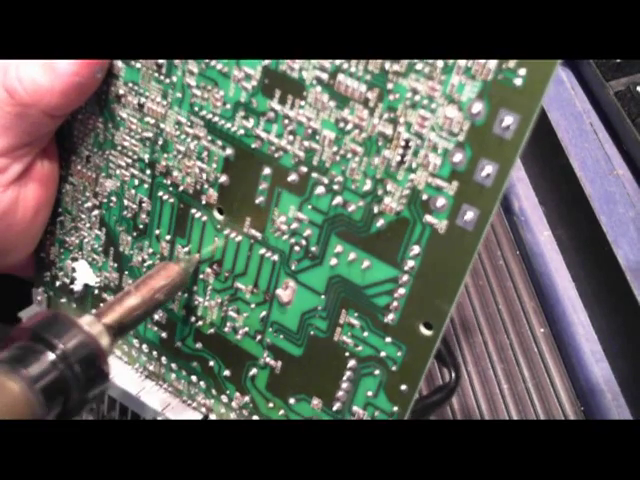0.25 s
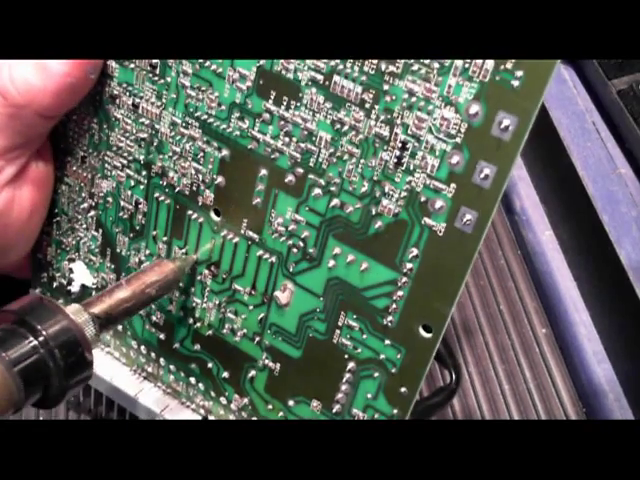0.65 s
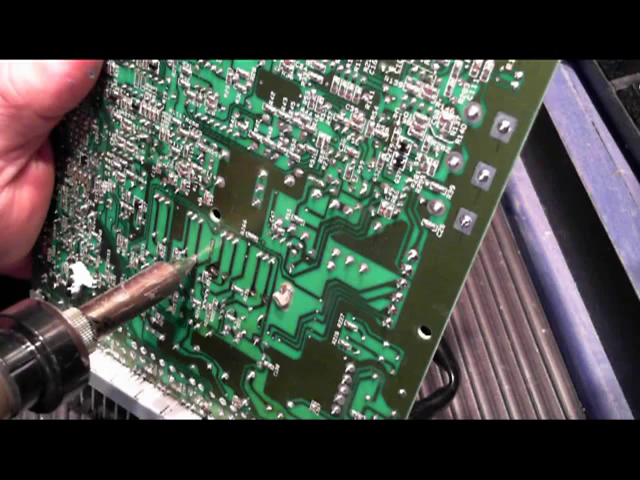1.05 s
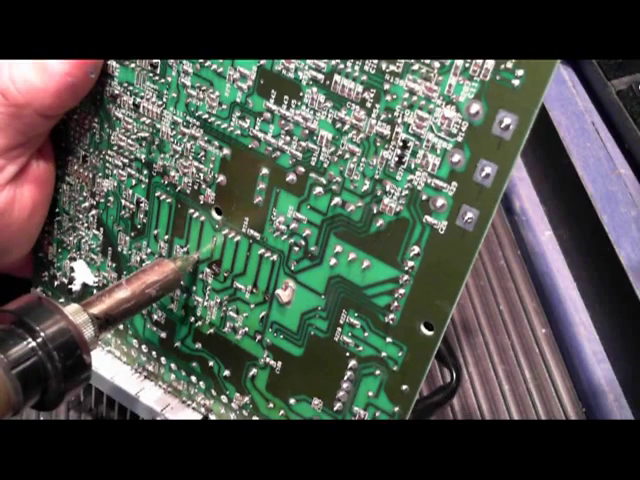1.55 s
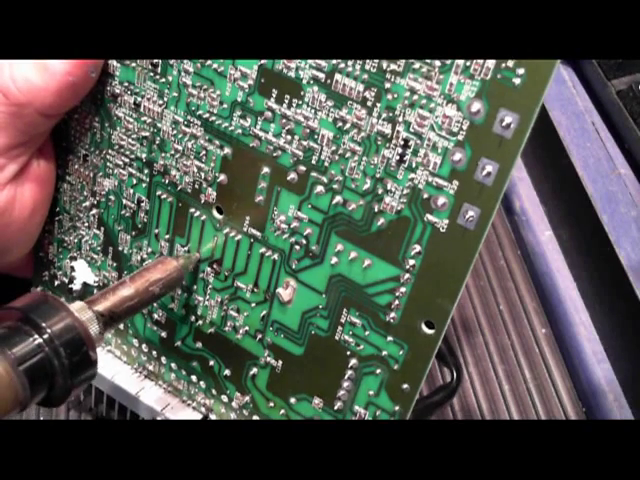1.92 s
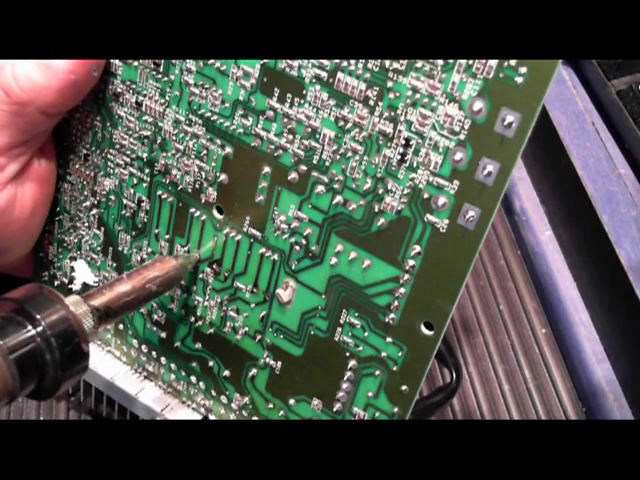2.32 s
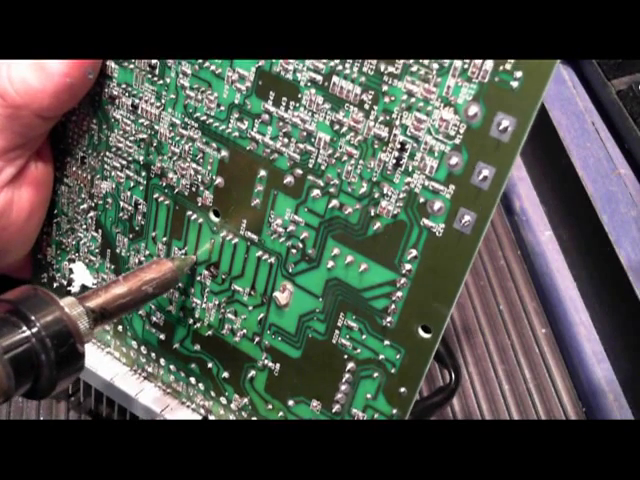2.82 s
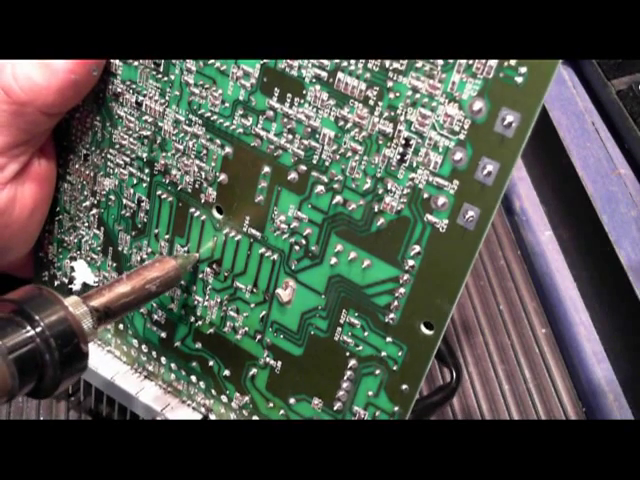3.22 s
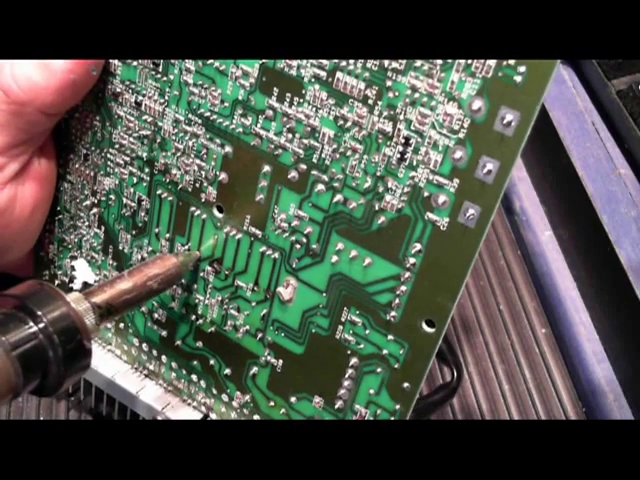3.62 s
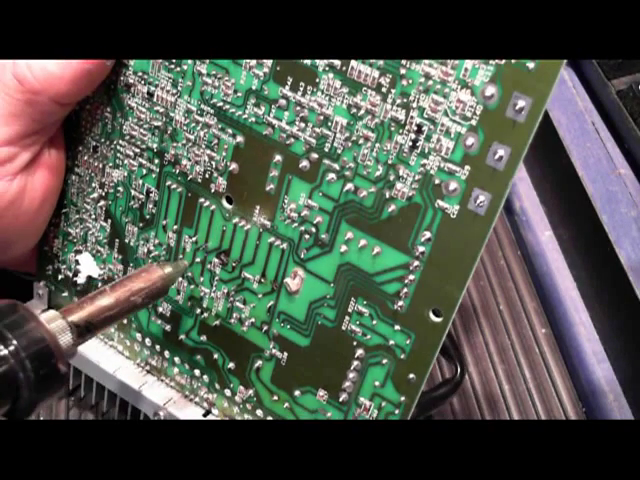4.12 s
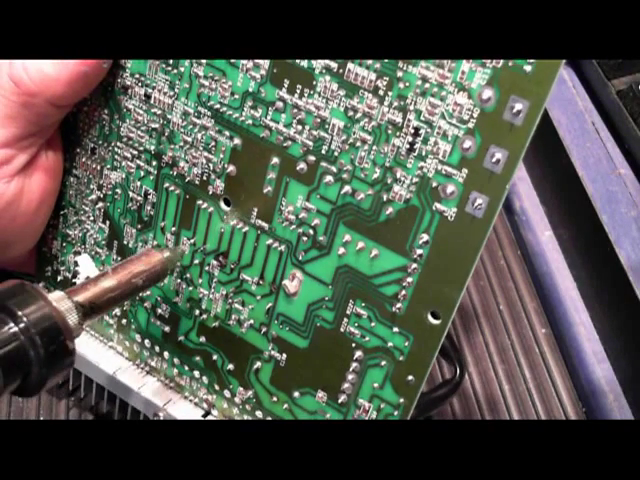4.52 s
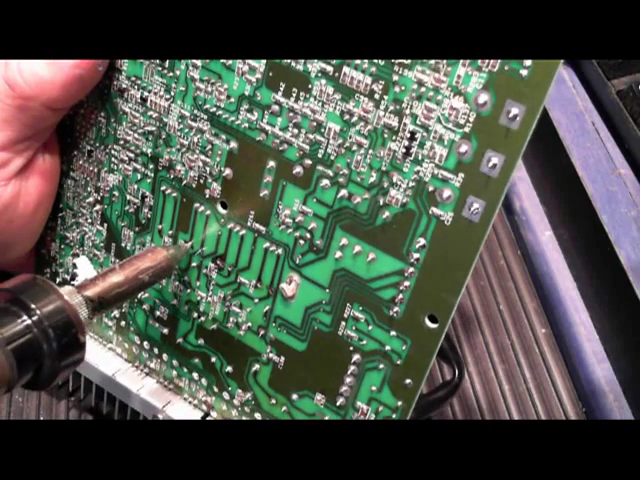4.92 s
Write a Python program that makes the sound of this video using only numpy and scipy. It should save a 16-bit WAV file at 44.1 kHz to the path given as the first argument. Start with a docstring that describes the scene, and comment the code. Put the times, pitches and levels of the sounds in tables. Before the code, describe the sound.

Faint sizzling, then a short buzzing whine and hiss from a desoldering tool's pump, followed by light ticks on a circuit board.

```python
"""A small room, close to a circuit board: a desoldering gun at work. Flux spits twice on the hot nozzle,
the trigger clicks, and the diaphragm pump spins up, sags a little under its vacuum and stops. One shaft
drives its hum, whine, rattle and exhaust hiss in a plastic case. The nozzle then ticks lightly on the
board. Moving air rumbles on the microphone over room hiss and a distant fan."""
import sys
import numpy as np
from scipy import signal
from scipy.fft import rfft, irfft, next_fast_len
from scipy.io import wavfile
from scipy.ndimage import uniform_filter1d, map_coordinates

SR = 44100
rng = np.random.default_rng(int(sys.argv[2]) if len(sys.argv) > 2 else 0)


def pcm_store(signal):
    """Save signal as 16-bit PCM."""
    levels = np.round(np.clip(np.atleast_2d(signal), -1, 1) * 32767)
    wavfile.write(sys.argv[1], SR, levels.astype(np.int16).T)


N = 227203
TIME_S = np.arange(N) / SR
ON_S, SEAL_S, OFF_S = 1.174, 1.45, 2.614  # motor on, solder seals the nozzle, motor off
SINCE_ON_S, SINCE_OFF_S = np.maximum(TIME_S - ON_S, 0), np.maximum(TIME_S - OFF_S, 0)

# Pump case modes. Each row: frequency in Hz, width in Hz, gain in dB.
CASE_MODES = [(472, 59, -14.5), (752, 11.4, -6), (935, 103, -11.5), (1368, 43, -1.5), (1632, 97, 1.5),
              (1924, 64, 5), (2210, 140, -3.5), (2578, 93, 2.5), (2940, 150, -11.5), (3120, 60, -7.5),
              (4510, 230, -12), (4910, 133, -16), (5800, 230, -21)]
# Steel motor can modes. Each row: frequency in Hz, width in Hz, gain in dB.
CAN_MODES = [(1561, 12, -15), (1663, 8, -15), (1906, 9.5, 0), (1935, 14, -6), (1997, 8, -7),
             (2649, 10, -15)]
# Crack of hard plastic. Each row: frequency in Hz, relative density in dB.
PLASTIC_SPECTRUM = [(300, -3), (1300, -13), (2700, 11), (5500, 12), (8000, -4), (9500, -49), (12000, -45)]


def amp(db):
    """Decibels to gain."""
    return 10 ** (np.asarray(db) / 20)


def unit(x):
    """Scale to rms 1."""
    return x / np.sqrt(np.mean(x ** 2) + 1e-20)


def along(points, hz):
    """(Hz, value) points read on a log frequency axis."""
    point_hz, values = np.transpose(points)
    return np.interp(np.log(hz + 1), np.log(point_hz + 1), values)


def wobble(rate_hz):
    """Smooth random curve, rate_hz knots a second."""
    return map_coordinates(rng.standard_normal(int(N * rate_hz / SR) + 4), [TIME_S * rate_hz])


def filtered(x, response):
    """x through a frequency response."""
    size = next_fast_len(N + SR // 2)
    return irfft(rfft(x, size) * response(np.fft.rfftfreq(size, 1 / SR)), size)[:N]


def noise(spectrum):
    """Noise of rms 1, shaped by (Hz, dB) points."""
    return unit(filtered(rng.standard_normal(N), lambda hz: amp(along(spectrum, hz))))


def ring(x, modes):
    """x through (Hz, width Hz, dB) resonances of alternating sign."""
    def response(hz):
        return sum((-1) ** k * amp(db) * 1j * hz * width / (centre ** 2 - hz ** 2 + 1j * hz * width)
                   for k, (centre, width, db) in enumerate(modes))
    return filtered(x, response)


def mode_noise(modes):
    """Noise of rms 1 inside resonances."""
    return unit(ring(rng.standard_normal(N), modes))


def decay(start_s, t60_s):
    """Exponential envelope of a contact."""
    age_s = TIME_S - start_s
    return (age_s >= 0) * amp(-60 * np.abs(age_s) / t60_s)


def ramp(start_s, rise_s):
    """Linear rise from 0 to 1."""
    return np.clip((TIME_S - start_s) / rise_s, 0, 1)


def background(hiss_db=-57, fan_db=-63, whistle_hz=9890, whistle_db=-86):
    """Steady room hiss, a distant fan and a thin electrical whistle."""
    # Each row: frequency in Hz, relative density in dB.
    hiss_spectrum = [(35, -40), (60, 16.5), (91, 1), (331, -5.5), (395, -4), (422, -8.5), (658, -3.5),
                     (719, -6), (1280, 2), (1400, 2.5), (2180, 3.5), (3470, -5), (4730, -7.5),
                     (5770, -16.5), (12000, -26.5), (15600, -60), (22000, -120)]
    # Each row: frequency in Hz, width in Hz, gain in dB.
    fan_modes = [(1308, 45, -3), (1729, 23, 5.5), (2156, 107, 1.5), (2520, 65, -6), (4260, 680, -13)]
    whistle = amp(whistle_db) * np.sin(2 * np.pi * whistle_hz * TIME_S)
    return amp(hiss_db) * noise(hiss_spectrum) + amp(fan_db) * mode_noise(fan_modes) + whistle


def room(x):
    """Bench and walls return a short diffuse tail."""
    # Each row: frequency in Hz, T60 in seconds.
    reverb_times = [(200, 0.2), (2000, 0.19), (10000, 0.36)]
    hz, age_s, bins = signal.stft(rng.standard_normal(SR // 2), SR, nperseg=256)
    tail = signal.istft(bins * amp(-60 * age_s / along(reverb_times, hz)[:, None]), SR, nperseg=256)[1]
    return signal.fftconvolve(x, np.pad(tail, (SR // 300, 0)) / np.linalg.norm(tail))[:N]


def gust(start_s, hold_s, attack_s=.045, release_s=.052):
    """Gust envelope: swells up to start_s, holds, dies away."""
    age_s = TIME_S - start_s
    return ramp(start_s - attack_s, attack_s) ** 2 * np.exp(-np.maximum(age_s - hold_s, 0) / release_s)


def buffeting(draught_db=-57.5):
    """Low turbulence on the microphone; gusts that meet it squarely break into finer eddies."""
    # Each row: frequency in Hz, relative density in dB.
    coarse_spectrum = [(5, 8.5), (14, 0.5), (28, 5.5), (55, -10.5), (100, -35), (160, -53), (300, -59),
                       (700, -93)]
    fine_spectrum = [(30, -2.5), (70, 2.5), (110, -8.5), (160, -18), (260, -33), (600, -68)]
    # Each row: start in seconds, hold in seconds, coarse level in dB, fine level in dB.
    gusts = [(0, 0.14, -33.5, -51), (0.224, 0.15, -41, -62), (0.495, 0.03, -34, -64),
             (0.754, .03, -42, -66), (1.809, 0.72, -36.5, -49), (1.995, 0.09, -50, -34.5),
             (2.177, 0.29, -48, -41), (2.607, 0.06, -36, -45), (2.839, 0.062, -43.5, -69),
             (3.12, 0.23, -50, -72), (4.28, .14, -32.5, -51), (4.513, 0.073, -37, -44),
             (4.655, 0.14, -36, -43), (5.034, 0.12, -36, -54.5)]
    eddies = noise(coarse_spectrum)
    local_power = np.abs(uniform_filter1d(eddies ** 2, size=SR // 10)) + 1e-6
    coarse_power, fine_power = sum(np.outer(amp([coarse_db, fine_db]), gust(start_s, hold_s)) ** 2
                                   for start_s, hold_s, coarse_db, fine_db in gusts)
    coarse = np.sqrt(coarse_power + amp(draught_db) ** 2) * unit(eddies / np.sqrt(local_power))
    fine = np.sqrt(fine_power) * noise(fine_spectrum)
    return (coarse + fine) * signal.windows.tukey(N, .008)


def flux(gain_db=-4, spray_width_hz=300):
    """Flux boils off in short spurts: steam with a pitched spray."""
    # Each row: frequency in Hz, relative density in dB.
    steam_spectrum = [(700, -32), (1400, -11), (2200, 8.5), (3200, 0.5), (5000, -1.5), (6500, 3),
                      (8500, -6), (10000, -9.5), (12000, -13)]
    # Each row: start in seconds, relative level in dB, spray in Hz, rise in seconds, spray/steam in dB.
    spits = [(0.223, -49, 4260, 0.013, 9), (0.253, -37.5, 3240, .012, -4),
             (0.278, -46.5, 2210, 0.0081, 3.5), (0.531, -42.5, 2460, 0.013, -12),
             (0.562, -41.5, 2300, 0.0081, 1)]
    steam, out = noise(steam_spectrum), np.zeros(N)
    for start_s, db, spray_hz, rise_s, spray_db in spits:
        progress = np.maximum(TIME_S - start_s, 0) / rise_s
        spray = amp(spray_db) * mode_noise([(spray_hz, spray_width_hz, 0)])
        out += amp(db + gain_db) * progress * np.exp(1 - progress) * (steam + spray)
    return out


def nozzle(plastic_db=-13):
    """The nozzle ticks against the board, then nudges it softly."""
    # Each row: start in seconds, level in dB, rise in seconds, T60 in seconds.
    taps = [(3.323, -42, .001, .04), (4.191, -47, .003, .05), (4.276, -45, .004, .06),
            (4.612, -50, .008, .12), (4.903, -48.5, .006, .09)]
    # Each row: frequency in Hz, width in Hz, gain in dB.
    board_modes = [(1085, 130, 7), (1500, 250, 9), (2130, 270, 7), (3200, 190, 2)]
    touch = sum(amp(db) * ramp(start_s, rise_s) * decay(start_s, t60_s)
                for start_s, db, rise_s, t60_s in taps)
    return (mode_noise(board_modes) + amp(plastic_db) * noise(PLASTIC_SPECTRUM)) * touch


def grip_clacks(gain_db=-1, t60_s=.029, width_hz=500):
    """The trigger switch and the first hard pump strokes clack in the plastic grip."""
    # Each row: start in seconds, relative level in dB, ring in Hz.
    clacks = [(1.1521, -32.5, 5500), (1.181, -33, 4560), (1.187, -27, 4800), (1.2, -32.5, 4400),
              (2.606, -27.5, 6250)]
    crack = noise(PLASTIC_SPECTRUM)
    return sum(amp(db + gain_db) * decay(start_s, t60_s) * (crack + mode_noise([(hz, width_hz, 0)]))
               for start_s, db, hz in clacks)


def lag(spin_up_s=.15):
    """Share of the spin-up still to come, 1 to 0."""
    return np.exp(-SINCE_ON_S / spin_up_s)


def vacuum(half_s=.21):
    """Vacuum builds from 0 to 1 once the nozzle is sealed."""
    progress = np.maximum(TIME_S - SEAL_S, 0) / half_s
    return progress ** 2 / (1 + progress ** 2)


def drive(rise_s=.026, fall_db_per_s=450):
    """Drive envelope: the motor bites within a stroke or two and brakes against the vacuum."""
    return ramp(ON_S, rise_s) * amp(-fall_db_per_s * SINCE_OFF_S)


def shaft(start_hz=49, free_hz=99, sag_hz=11.75, coast_s=.07, rest_turns=.45):
    """Shaft angle in turns from top of stroke: spins up, sags under vacuum, coasts to a halt."""
    speed_hz = free_hz - (free_hz - start_hz) * lag() - sag_hz * vacuum()
    return rest_turns + np.cumsum(speed_hz * (TIME_S >= ON_S) * np.exp(-SINCE_OFF_S / coast_s)) / SR


def pump_air(turns, exhaust_db=-32, vacuum_db=1.6, puff_db=2, intake_db=-55.5, intake_hz=11000):
    """One exhaust puff a turn, harder under vacuum; a thin intake hiss fades as the hose empties."""
    # Each row: frequency in Hz, relative density in dB.
    exhaust_spectrum = [(150, -26), (400, -26), (1200, -11.5), (1600, -2), (2700, 2.5), (3700, -4.5),
                        (6200, -7.5), (7000, -14), (8300, -15.5), (8900, -25), (9400, -18), (10200, -34),
                        (11500, -29), (13000, -53)]
    exhaust = amp(exhaust_db + vacuum_db * vacuum()) * noise(exhaust_spectrum)
    intake = amp(intake_db) * mode_noise([(intake_hz, 900, 0)]) * (1 - ramp(ON_S, rise_s=.2))
    return drive() * amp(puff_db * np.cos(2 * np.pi * turns)) * (exhaust + intake)


def pump_strokes(turns, rise_s=.0018, fade_db=.65, detune=.002):
    """The motor kicks in its mount; each slow stroke knocks the case and leaves the motor can ringing."""
    # Each row: start in seconds, knock in dB, can in dB, thud in dB.
    starting = [(start_s, -21 - fade_db * k, -38 - fade_db * k, -39 - fade_db * k)
                for k, start_s in enumerate(np.interp(np.arange(15) + 1.8, turns, TIME_S))]
    stalling = [(OFF_S + .008 + .0175 * k + .0015 * k ** 2, -22.5 - 2 * k ** 2, -37 - 2 * k ** 2, -38)
                for k in range(3)]
    # Each row: frequency in Hz, width in Hz, gain in dB.
    thud_modes = [(474, 46, -4.5), (937, 29, 0.5)]
    case, thud = mode_noise(CASE_MODES), mode_noise(thud_modes)
    out = amp(-39) * decay(ON_S, t60_s=.18) * (case + thud)  # mount kick
    for start_s, knock_db, can_db, thud_db in starting + stalling:
        age_s = np.maximum(TIME_S - start_s, 0)
        can = sum(amp(db) * np.exp(-np.pi * width_hz * age_s)
                  * np.sin(2 * np.pi * hz * rng.normal(1, detune) * age_s)
                  for hz, width_hz, db in CAN_MODES)
        knock = amp(knock_db) * decay(start_s, t60_s=.041) * case
        knock += amp(thud_db) * decay(start_s, t60_s=.053) * thud
        out += ramp(start_s, rise_s) * knock + amp(can_db) * can
    return out


def crank_slack(run_db=-39, lag_db=10, release_db=6, release_s=.025):
    """Rattle gain: highest with the crank unloaded, in spin-up and as the drive lets go."""
    return amp(run_db + lag_db * lag() + release_db * ramp(OFF_S - release_s, release_s))


def pump_rattle(turns, per_turn=5, jitter_s=.0005, spread_db=3, accent_db=3, slow_db=5, can_db=2):
    """Valves and crank knock on case and can; one accent a turn, clearest at low speed."""
    knock_turns = np.arange(per_turn, int(turns[-1]) * per_turn) / per_turn
    times_s = np.interp(knock_turns, turns, TIME_S) + jitter_s * rng.standard_normal(len(knock_turns))
    stroke = np.cos(2 * np.pi * knock_turns)
    sizes_db = spread_db * rng.standard_normal(len(knock_turns)) + accent_db * stroke
    sizes_db += slow_db * np.interp(times_s, TIME_S, lag()) * (stroke - 1)
    samples = np.clip(times_s * SR, 0, N - 1).astype(int)
    hits = unit(np.bincount(samples, amp(sizes_db), N)) * drive()
    rattle = ring(hits, CASE_MODES) + amp(can_db) * ring(hits, CAN_MODES)
    case_gain = np.std(ring(rng.standard_normal(N), CASE_MODES))
    return crank_slack() * rattle / case_gain


def shaft_partials(turns, orders, waver_db, flutter_rad):
    """Tones locked to the shaft, each unsteady in level and phase; rms 1."""
    return unit(sum(amp(db + waver_db * wobble(9.19))
                    * np.sin(2 * np.pi * (order * turns + rng.random()) + flutter_rad * wobble(45))
                    for order, db in orders))


def pump_tones(turns, panel_hz=1290, extra_fall_db_per_s=500):
    """The diaphragm hums cleanly; the motor's whine flutters and radiates only above a panel mode."""
    # Each row: multiple of the shaft rate, relative level in dB.
    hum_orders = [(1, -17), (2, -21), (3, -20), (4, -9.5), (5, 0), (6, -11.5), (7, -11.5), (8, -2),
                  (9, -14), (10, -11), (11, -9.5), (12, -8), (13, -8), (14, -14), (15, -9)]
    whine_orders = [(16, -1.5), (17, -4.5), (18, -5), (19, -5), (20, -11), (22, -6), (23, 1), (24, -5),
                    (25, -2), (26, -13), (27, -4), (28, -1), (29, -9), (30, -6), (31, -11), (32, -11),
                    (33, -10), (34, -7), (37, -13), (38, -14), (39, -10)]
    hum = shaft_partials(turns, hum_orders, waver_db=2.04, flutter_rad=.021)
    whine = shaft_partials(turns, whine_orders, waver_db=1.8, flutter_rad=.13)
    whine = filtered(whine, lambda hz: 1 - 1 / (1 + (hz / panel_hz) ** 40))
    hum_db = -37.6 - 15 * lag() - 2.3 * vacuum()
    whine_db = -32.7 - 12 * lag() + 3.4 * vacuum()
    envelope = drive() * amp(-extra_fall_db_per_s * SINCE_OFF_S)
    return envelope * (amp(hum_db) * hum + amp(whine_db) * whine)


def scene():
    """Mono mix: the gun close up, with a little room echo."""
    turns = shaft()
    tones = pump_tones(turns)
    clatter = pump_rattle(turns) + pump_air(turns) + pump_strokes(turns)
    contacts, spits = grip_clacks() + nozzle(), flux()
    echo = room(amp(-8) * clatter + amp(-15) * tones + amp(-10) * contacts + amp(-16) * spits)
    return (tones + clatter + contacts + spits + echo + buffeting() + background())[None]


def record(dry):
    """Steep low-pass band limit."""
    top_hz = 11900
    return filtered(dry[0], lambda hz: 1 / np.sqrt(1 + (hz / top_hz) ** 200))[None]


dry = scene()
out = record(dry)
pcm_store(out)
```